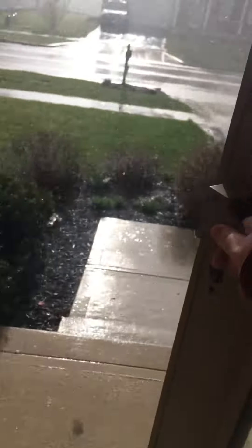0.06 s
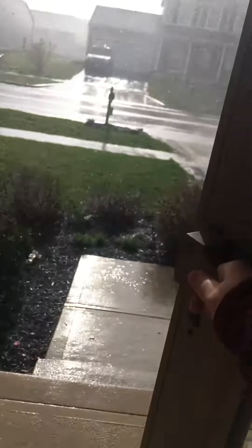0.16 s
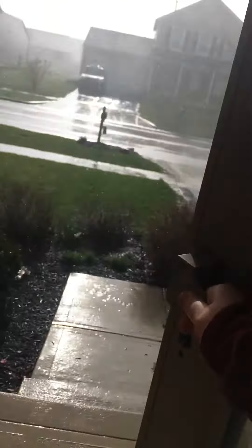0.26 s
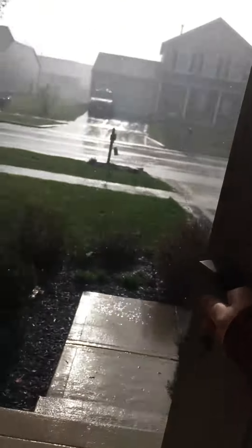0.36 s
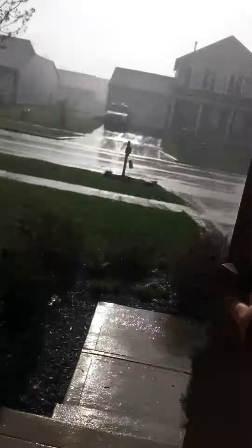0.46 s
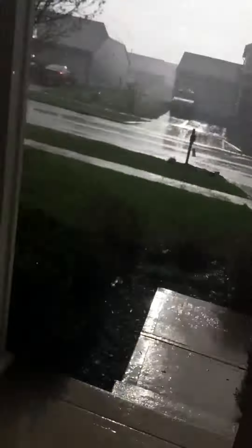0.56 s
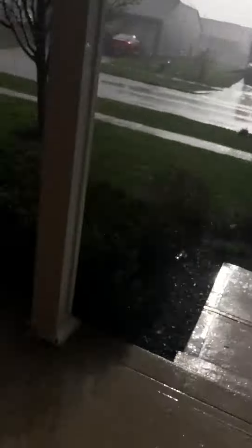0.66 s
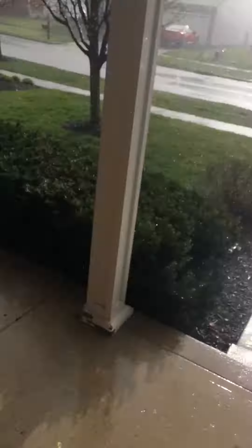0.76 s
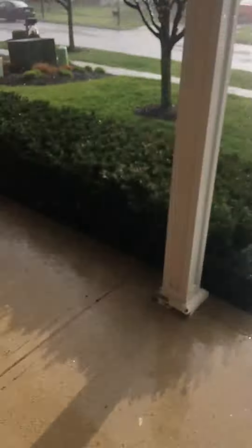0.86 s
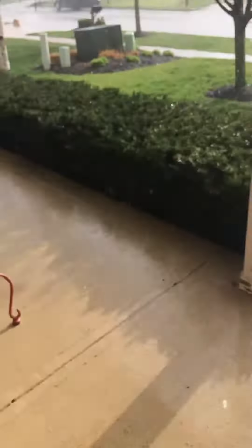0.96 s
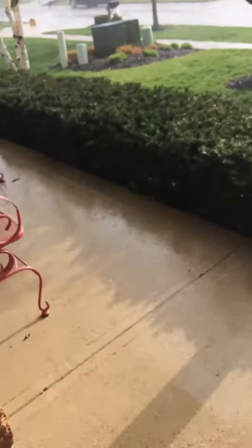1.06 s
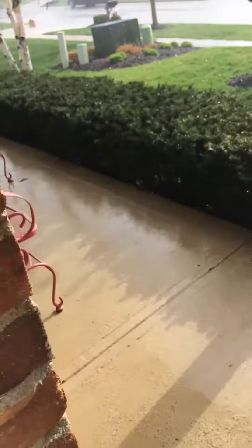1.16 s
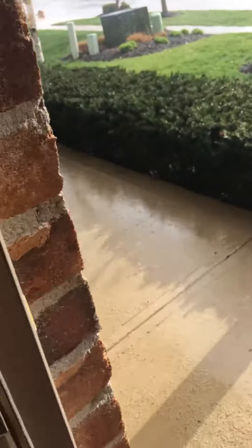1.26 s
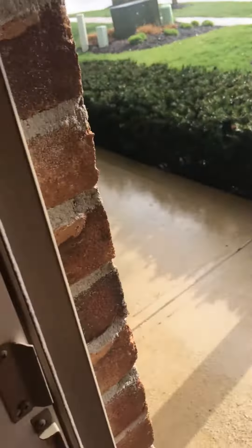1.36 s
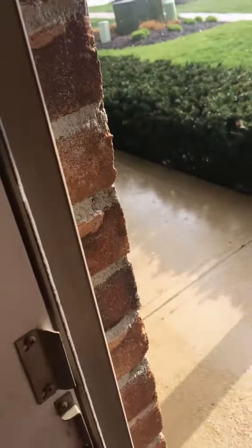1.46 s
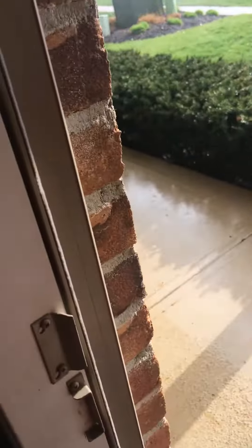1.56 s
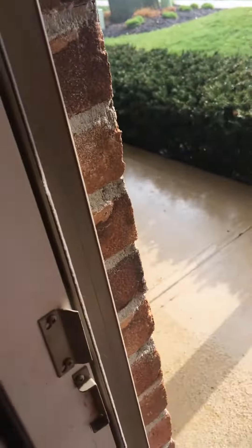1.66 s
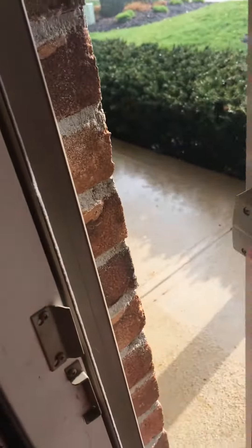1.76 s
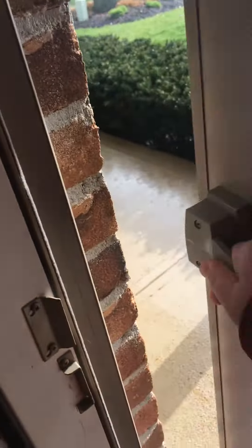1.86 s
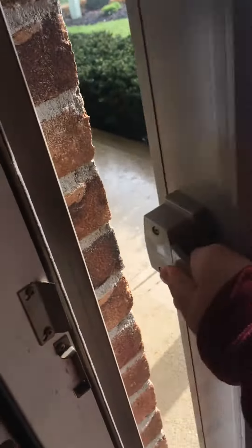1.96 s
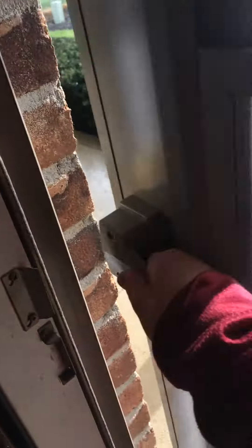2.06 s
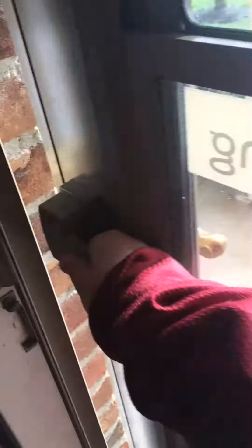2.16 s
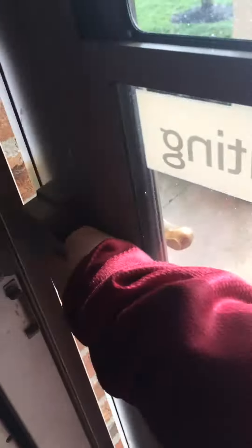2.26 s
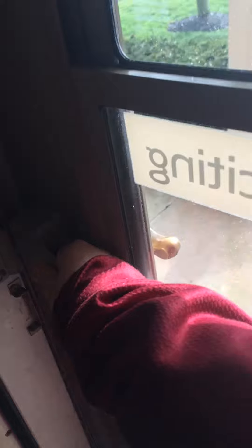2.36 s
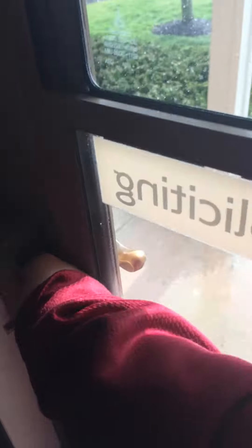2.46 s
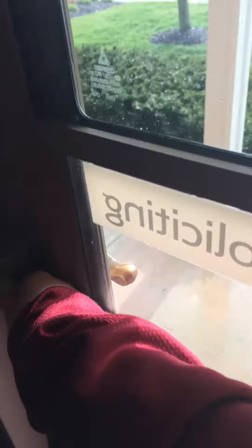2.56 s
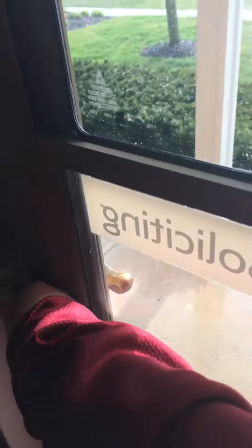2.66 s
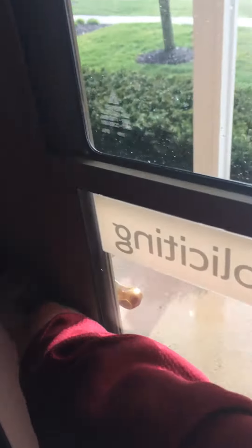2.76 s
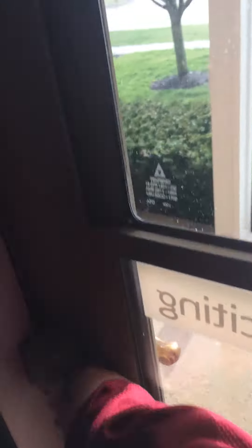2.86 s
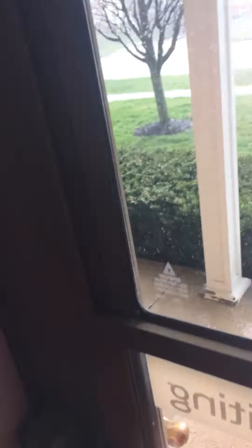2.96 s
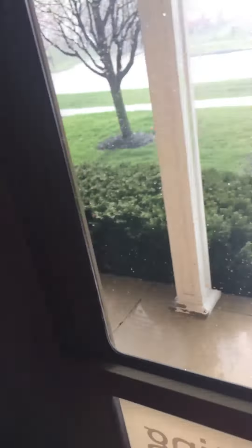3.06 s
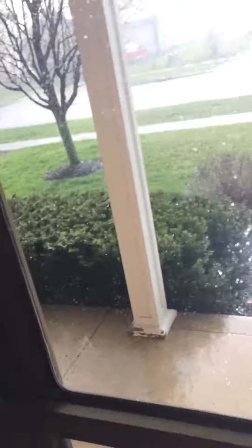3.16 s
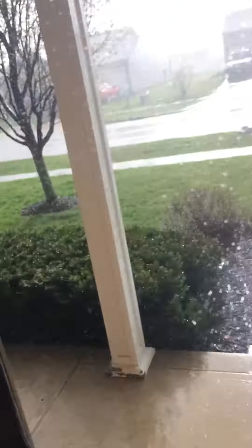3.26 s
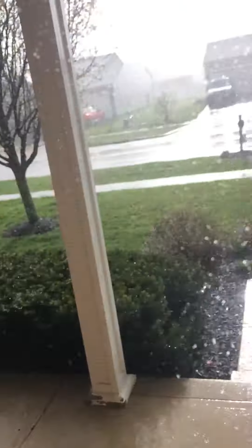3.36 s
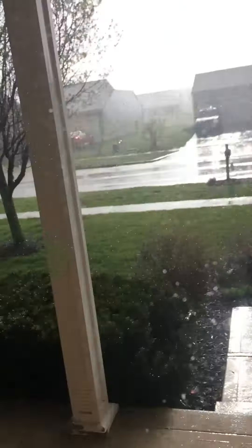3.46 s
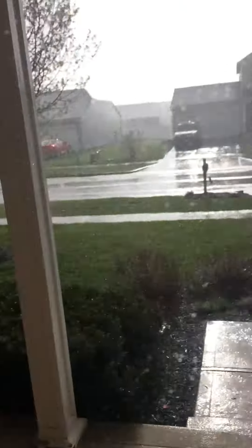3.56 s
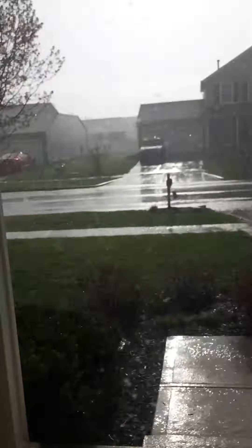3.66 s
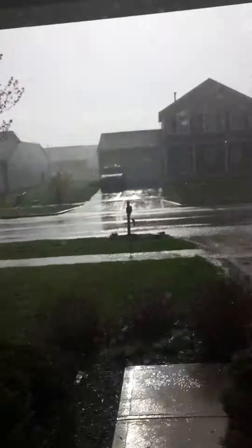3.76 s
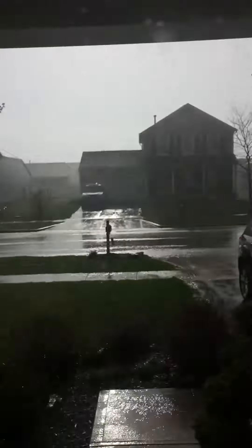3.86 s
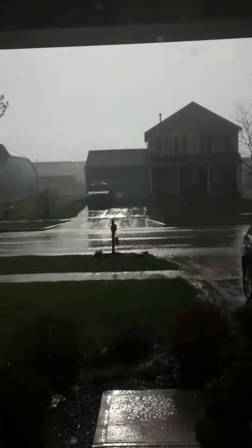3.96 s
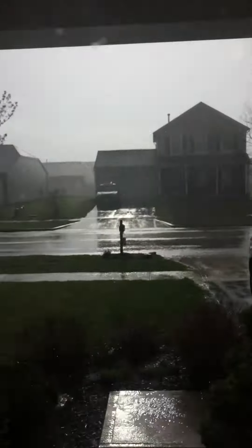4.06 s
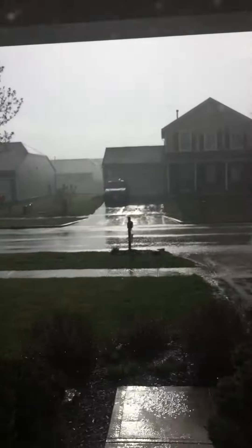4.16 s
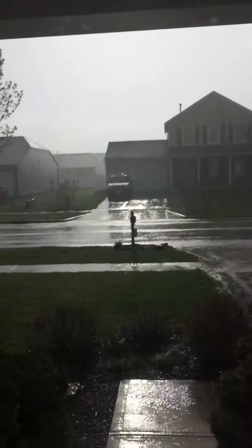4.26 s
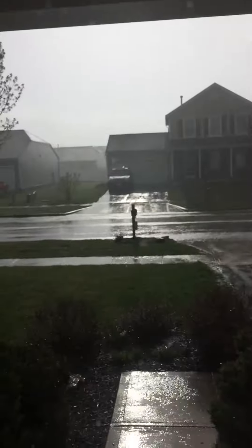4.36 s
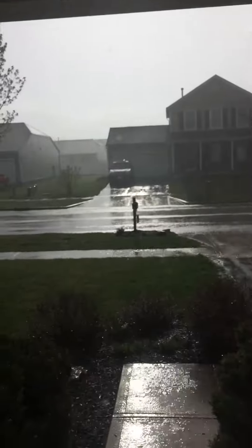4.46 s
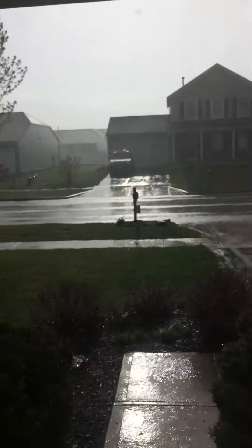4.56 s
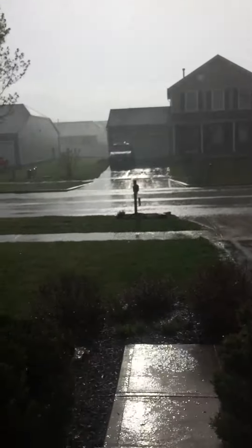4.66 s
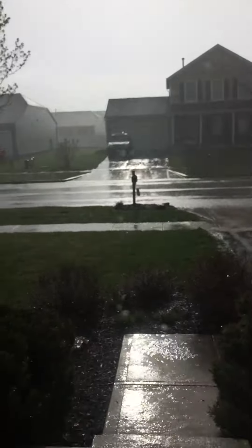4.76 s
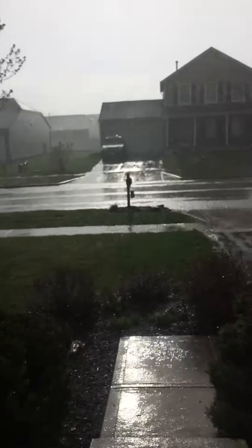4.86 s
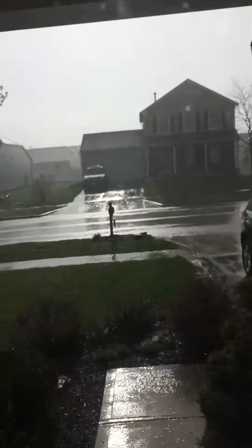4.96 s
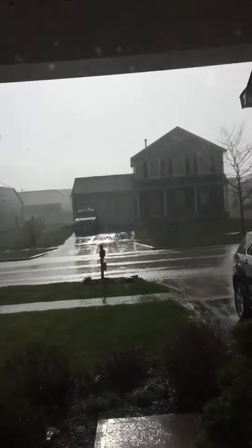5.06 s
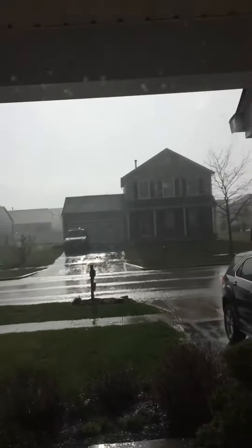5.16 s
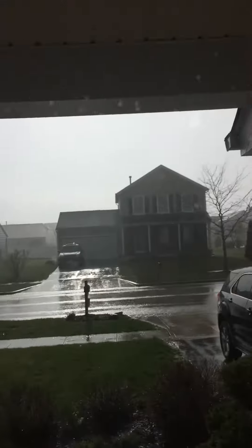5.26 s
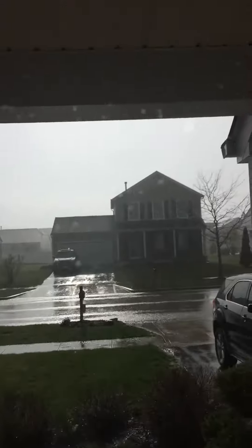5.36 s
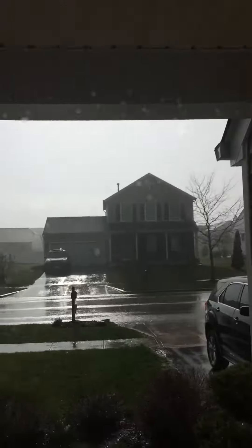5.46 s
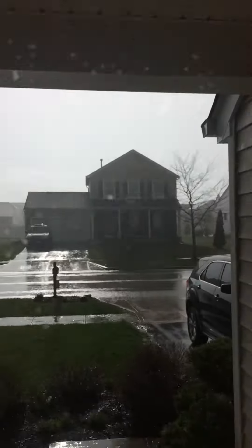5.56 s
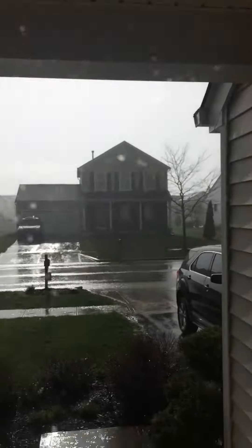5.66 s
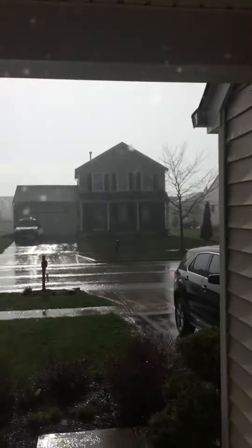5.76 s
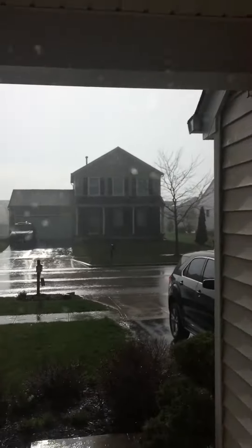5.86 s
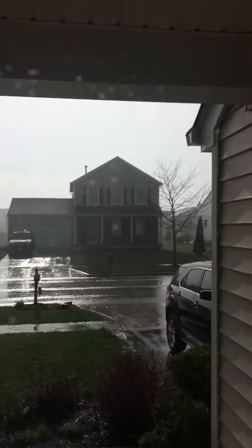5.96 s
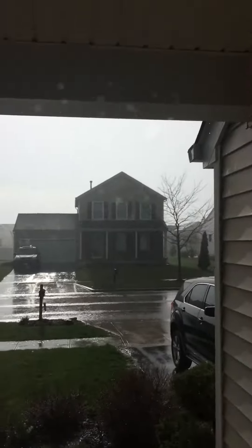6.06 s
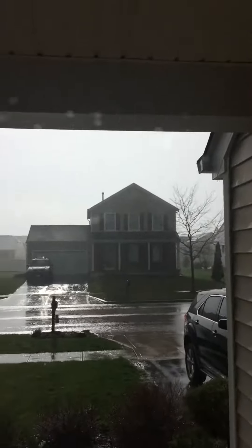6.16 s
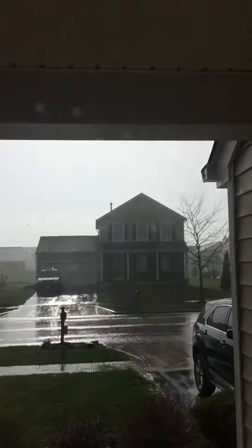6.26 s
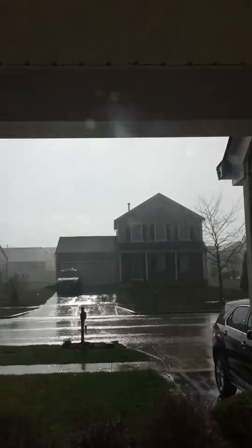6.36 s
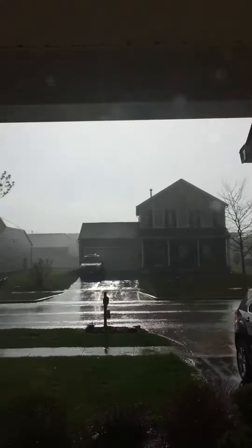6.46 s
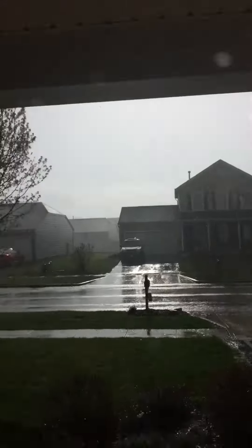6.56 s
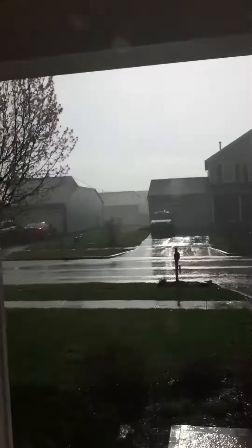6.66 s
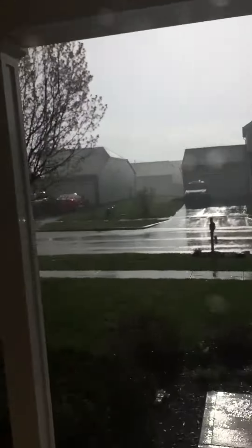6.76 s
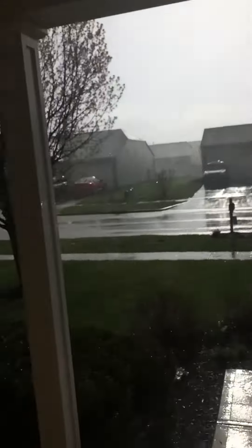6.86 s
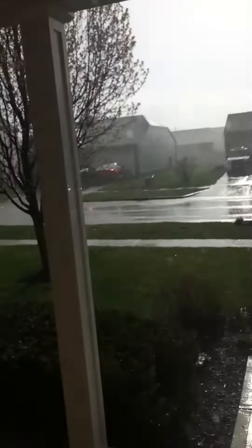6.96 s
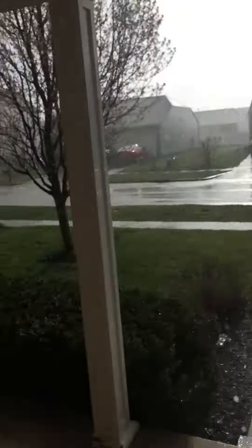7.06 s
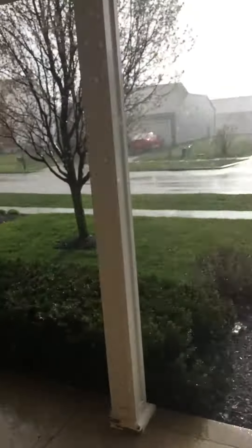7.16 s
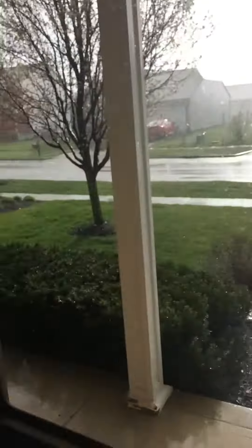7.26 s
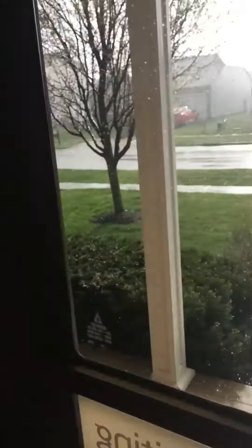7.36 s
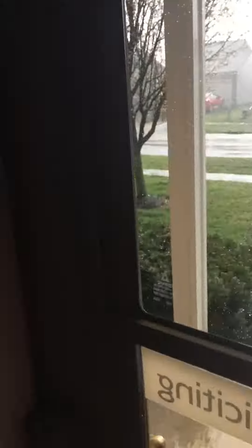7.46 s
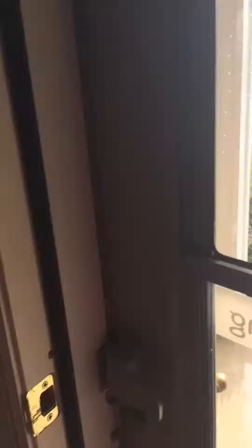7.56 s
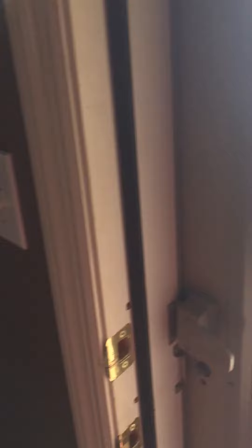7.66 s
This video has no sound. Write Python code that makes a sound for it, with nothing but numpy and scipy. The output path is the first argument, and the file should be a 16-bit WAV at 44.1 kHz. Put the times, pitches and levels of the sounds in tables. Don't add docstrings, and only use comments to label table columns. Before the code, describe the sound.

From a doorway, a handheld phone picks up dense rain hiss over low gusty rumble, muffled steps and fabric flicks. A door is pulled to, dulling the rain, until a hard metallic latch crack and heavy thump shut it out, with a brief rattle and short hallway reverberation. Then near quiet: muffled rain, light taps on the pane, dull footfalls, a firm late knock and faint cloth rubbing.

```python
import sys
import numpy as np
from scipy import signal
from scipy.fft import rfft, irfft, next_fast_len
from scipy.io import wavfile
from scipy.ndimage import uniform_filter1d, map_coordinates

SR = 44100
rng = np.random.default_rng(int(sys.argv[2]) if len(sys.argv) > 2 else 0)


def ratio_of_db(decibels):
    return 10 ** (np.asarray(decibels, float) / 20)


def store_wav(level_fs):
    pcm = np.round(np.clip(np.atleast_2d(level_fs), -1, 1) * 32767)
    wavfile.write(sys.argv[1], SR, pcm.T.astype(np.int16))


N = 340050

# time in seconds, gain in dB.
DOOR_GAP = [
    (0, -0.5),
    (0.75, 0.5),
    (1.43, -3.5),
    (2.09, -7.5),
    (2.36, -11.5),
    (2.52, -33),
    (2.6, -46),
]
# start in seconds, peak in dB, pitch in Hz.
STEPS = [(0.03, -34, 167), (0.044, -28.5, 64.6), (0.422, -25.5, 63), (0.488, -33, 102), (0.635, -29, 61.7),
         (0.669, -44.5, 90), (0.757, -28, 162), (0.793, -22, 146.6), (0.915, -30.5, 103),
         (2.073, -19.5, 136), (2.224, -36.5, 93), (3.506, -25.5, 140.4), (4.808, -28.5, 156),
         (4.849, -42, 103), (5.901, -48.5, 70.4)]
# start in seconds, peak in dB, pitch in Hz.
BLOWS = [
    (2.578, -28, 131),
    (2.649, -29.5, 78),
    (2.687, -31.5, 108),
    (2.855, -20.5, 147.6),
    (2.892, -15, 124.3),
    (2.938, -23.5, 108.8),
    (2.973, -24.5, 162.4),
    (3.002, -45, 126),
]
# start in seconds, peak in dB, pitch in Hz.
SEAT = [
    (2.9235, -10.5, 60.3),
]
# start in seconds, peak in dB, bolt ring in Hz, frame in Hz.
DRAG = [(2.5452, -20, 5200, 1658), (2.5524, -34.5, 2580, 720), (2.5775, -23.5, 3260, 1690),
        (2.5825, -36.5, 3000, 1490), (2.6234, -39.5, 3620, 719), (2.6364, -29, 3230, 1448),
        (2.6409, -21.5, 3403, 1420), (2.7132, -34, 4030, 1153), (2.7184, -34.5, 3990, 1630),
        (2.7496, -45, 4270, 830), (2.7664, -54.5, 5760, 877), (2.796, -44.5, 4575, 1379),
        (2.8234, -43, 3060, 705)]
# start in seconds, peak in dB, bolt ring in Hz, frame in Hz.
SNAP = [(2.8782, -2, 4490, 1860), (2.8838, -12, 4340, 1900), (2.9067, -27.5, 4450, 1040),
        (2.9232, -24, 2927, 1186), (2.9404, -20.5, 3050, 1720), (2.9591, -25.5, 3180, 840),
        (2.9746, -15, 2360, 1670), (2.9836, -22, 3970, 1200), (3.0008, -49, 3795, 1040),
        (3.0535, -37.5, 3240, 1610), (3.0746, -44, 3100, 1030), (3.1275, -37, 2700, 1180),
        (3.1774, -56, 2890, 714), (3.2368, -55, 2790, 2080)]
# frequency in Hz, density in dB per Hz.
RATTLE_COLOUR = [(180, -28), (300, 13), (729, -5), (1030, -6), (1120, -7), (2860, -12), (3660, -9),
                 (8460, -27.5), (15300, -26)]


def unit(x):
    return x / np.sqrt(np.mean(np.abs(x) ** 2) + 1e-20)


def along(points, hz):
    f, v = np.transpose(points)
    return np.interp(np.log(hz + 1), np.log(f + 1), v)


def curves(rows, outside=None):
    s, *cols = np.transpose(rows)
    return [np.interp(np.arange(N) / SR, s, c, outside, outside) for c in cols]


def wobble(rate):
    knots = rng.standard_normal(int(N * rate / SR) + 4)
    return map_coordinates(knots, [np.arange(N) * rate / SR])


def filtered(x, response):
    m = next_fast_len(len(x) + 8192)
    return irfft(rfft(x, m) * response(np.fft.rfftfreq(m, 1 / SR)), m)[:len(x)]


def resonance(f, hz, width):
    return 1j * f * width / (hz * hz - f * f + 1j * f * width)


def patches(shape, bands):
    field = uniform_filter1d(rng.standard_normal(shape), size=bands, axis=0)
    return unit(uniform_filter1d(field, size=8, axis=1))


def rush(colour, patchy_db, drops=0):
    z = signal.stft(rng.standard_normal(N), nperseg=512)[2]
    noise = signal.istft(z * ratio_of_db(patchy_db * patches(z.shape, 14)), nperseg=512)[1][:N]
    hits = rng.random(N) < 900 / SR
    sizes_db = 4 * np.minimum(rng.exponential(size=N), 3.5)
    impacts = hits * rng.uniform(-1, 1, N) * ratio_of_db(sizes_db)
    return unit(filtered(unit(noise) + drops * unit(impacts), lambda hz: ratio_of_db(along(colour, hz))))


def add(track, s, sound):
    part = track[round(s * SR):][:len(sound)]
    part += sound[:len(part)]


def aftermath(rows, db, grows, rise, t60):
    power, t = np.zeros(N), np.arange(SR // 2) / SR
    for s, peak_db, *_ in rows:
        swell = ratio_of_db(db + grows * peak_db - 60 * t / t60) * (1 - np.exp(-t / rise))
        add(power, s, swell ** 2)
    return np.sqrt(power)


def tones(rows, soft, shake_db):
    t, out = np.arange(N) / SR, np.zeros(N)
    for start, stop, hz, db, t60 in rows:
        gate = np.clip((t - start) / soft, 0, 1) * np.clip((stop - t) / 0.02, 0, 1)
        level = ratio_of_db(db - 60 * np.abs(t - start) / t60 + shake_db * wobble(25))
        out += level * gate * np.sin(2 * np.pi * hz * t)
    return out


def rain():
    # frequency in Hz, density in dB per Hz.
    patter_colour = [(120, -29), (200, 1), (248, 0.5), (325, -9), (557, -7.5), (769, -15), (1120, -8),
                     (5000, -23.5), (6500, -51.5), (11000, -120)]
    hiss_colour = [(1470, 1.5), (2500, 0.5), (3850, -4), (6800, -3), (7730, -5.5), (13000, -6.5),
                   (15300, -12)]
    indoor_colour = [(120, -39), (200, -2), (244, -9.5), (421, -7.5), (553, -10.5), (687, -10), (794, -14),
                     (1250, -12.5), (1550, -15), (2730, -17), (4970, -24), (6890, -22), (12100, -29),
                     (15300, -29)]
    # time in seconds, level in dB.
    murmur = [
        (0, -58),
        (5.3, -60.5),
        (7.3, -59),
        (7.71, -64.5),
    ]
    gap_db, surge_db = curves(DOOR_GAP)[0], 0.14 * wobble(12)
    patter = ratio_of_db(-47 + gap_db + surge_db) * rush(patter_colour, patchy_db=1.5, drops=0.22)
    hiss = ratio_of_db(-46 + 2 * gap_db + surge_db) * rush(hiss_colour, patchy_db=2.5, drops=0.32)
    murmur_db = curves(murmur)[0] + 0.19 * wobble(5.5)
    return patter + hiss + ratio_of_db(murmur_db) * rush(indoor_colour, patchy_db=1.5, drops=0.18)


def rumble():
    # frequency in Hz, density in dB per Hz.
    deep_colour = [(12, -40), (20, -20), (53, 0), (108, -3), (146, -0.5), (204, -12.5), (350, -18.5),
                   (460, -29.5), (770, -120)]
    calm_colour = [(12, -67), (20, -23), (52, -5.5), (108, -1), (173, -6.5), (239, -14), (350, -17.5),
                   (460, -51.5), (770, -120)]
    gusty = unit(ratio_of_db(2.8 * wobble(13)) * rush(deep_colour, patchy_db=1))
    storm = ratio_of_db(-45.5 + curves(DOOR_GAP)[0])
    pushes = aftermath(STEPS + BLOWS + SEAT, db=-14.5, grows=0.94, rise=0.017, t60=0.4)
    return np.hypot(storm, pushes) * gusty + ratio_of_db(-55.5) * rush(calm_colour, patchy_db=0.4)


def chime():
    # strike in seconds, damped in seconds, pitch in Hz, level in dB, t60 in seconds.
    rods = [
        (.205, .42, 8899, -38, 0.75),
        (.205, 0.44, 8624, -47, 2.5),
        (.205, 0.28, 13920, -48, .16),
        (.205, .3, 14350, -52, .26),
        (-0.033, .09, 4581, -49, 2),
        (.11, .33, 4581, -52.5, 1.5),
        (-0.056, 0.11, 4382, -51, 0.72),
    ]
    tick = np.zeros(N)
    tick[round(rods[0][0] * SR)] = ratio_of_db(-10)
    tick = filtered(tick, lambda f: resonance(f, 9200, 1200) + 0.5 * resonance(f, 13000, 2000))
    return tones(rods, soft=0.0005, shake_db=3) + tick


def thuds(rows, contact_s, ring_db):
    out, t = np.zeros(N), np.arange(SR // 2) / SR
    through = np.clip(t / contact_s, 0, 1)
    press = np.sin(np.pi * through)
    after = ratio_of_db(ring_db - 60 * t / 0.2) * through
    sag = 0.0084 * (1 - np.exp(-t / 0.015))
    for s, db, hz in rows:
        mode = np.sin(2 * np.pi * hz * (0.813 * t + sag))
        add(out, s - 0.001, ratio_of_db(db) * np.maximum(press, after) * mode)
    return out


def body_thuds():
    # start in seconds, peak in dB, pitch in Hz.
    pane_thump = [
        (6.137, -15.5, 142.3),
    ]
    feet = thuds(STEPS + pane_thump, contact_s=0.037, ring_db=-7)
    leaf = thuds(BLOWS, contact_s=0.043, ring_db=-15)
    return feet + leaf + thuds(SEAT, contact_s=0.015, ring_db=-14)


def knocks():
    # start in seconds, peak in dB, contact pitch in Hz, low part in dB.
    taps = [(0.427, -34, 596, 5), (0.71, -31, 647, -6), (0.799, -26, 742, 3), (0.807, -29.5, 810, -7),
            (1.297, -35, 1610, -1), (2.908, -16.5, 1014, -2.5), (2.914, -18, 1005, -10),
            (3.942, -27, 1022, -12.5), (4.667, -45.5, 1230, -6.5), (5.621, -29.5, 1060, -13.5),
            (5.625, -28, 1004, -6.5), (5.67, -53, 1220, -0.5), (5.922, -46.5, 1400, -2),
            (6.127, -28, 1110, 6), (6.137, -13.5, 1147, -4), (6.143, -21, 994, -5), (6.184, -35, 1100, 6.5)]
    # frequency in Hz, level in dB, t60 in seconds.
    pane_modes = [(209.3, 8.5, 0.27), (390, -23, 0.2), (418, -9, 0.28), (705, -7, 0.29), (777, -5.5, 0.06),
                  (844, -9.5, 0.23), (908, -1.5, 0.11), (1060, -14, 0.22), (1470, -16.5, 0.057),
                  (1530, -44.5, 0.22), (1820, -15, 0.1), (2230, -19.5, 0.063)]
    contact_t60 = 0.04
    out, t = np.zeros(N), np.arange(SR // 2) / SR
    for s, db, hz, low_db in taps:
        noise = rng.standard_normal((4, len(t)))
        luck_db = rng.normal(0, 2, len(pane_modes))
        contact = np.sin(2 * np.pi * hz * t) * ratio_of_db(-60 * t / contact_t60)
        grit = filtered(noise[0] * ratio_of_db(-60 * t / (0.72 * contact_t60)),
                        lambda f: resonance(f, hz, 1.22 * hz) ** 2)
        low = filtered(noise[1] * ratio_of_db(-60 * t / 0.051), lambda f: resonance(f, 374, 240) ** 2)
        click = filtered(noise[2] * ratio_of_db(-60 * t / 0.035), lambda f: resonance(f, 2800, 4000) ** 3)
        click_db = -34.5 - 0.8 * (db + 4.5) - 0.8 * low_db
        lasting = np.clip(1 + db / 35, 0.3, 1)
        ring = np.zeros(len(t))
        for (mode, level, t60), more in zip(pane_modes, luck_db):
            mode_db = level + more + low_db * (mode < 300)
            ring += ratio_of_db(mode_db - 60 * t / (t60 * lasting)) * np.sin(2 * np.pi * mode * t)
        blur = filtered(noise[3] * ratio_of_db(-60 * t / (0.6 * lasting)), lambda f: resonance(f, 800, 870) ** 3)
        mix = contact + 1.23 * grit + ratio_of_db(low_db + 19.5) * low + ratio_of_db(click_db) * click
        mix += ratio_of_db(-7) * ring + 0.68 * blur
        add(out, s + 0.0012, ratio_of_db(db - 3) * mix * (1 - np.exp(-t / 0.00035)))
    return out


def cloth_flicks():
    # start in seconds, peak in dB, centre in Hz.
    flicks = [(0.584, -44.5, 3870), (0.666, -27.5, 6840), (0.847, -33.5, 5330), (0.938, -35, 6540),
              (1.232, -34.5, 8900), (1.5194, -56.5, 3680), (3.384, -50, 6000), (3.5, -48, 9000),
              (3.615, -51.5, 7000), (3.6438, -49, 6670), (3.682, -42, 3160), (3.725, -46.5, 2570),
              (3.833, -48.5, 6500), (4.01, -50, 2800), (4.0921, -48.5, 9040), (4.382, -49, 3040),
              (4.82, -45, 2920), (4.912, -50, 5800), (5.203, -58, 2850), (5.233, -47.5, 6900),
              (5.338, -50.5, 8190), (5.87, -66, 2710), (6.562, -51.5, 9500), (6.58, -46, 2970),
              (7.11, -51, 4920), (7.311, -39.5, 2900)]
    out, t = np.zeros(N), np.arange(SR // 4) / SR
    for s, db, hz in flicks:
        octaves = np.clip(1.37 + 0.025 * (db + 37), 0.4, 1.1)
        spread = lambda f: np.where(f < hz, 0.56 * octaves, octaves)
        band = filtered(rng.standard_normal(len(t)),
                        lambda f: np.exp(-0.5 * (np.log2((f + 1) / hz) / spread(f)) ** 2))
        envelope = (1 - np.exp(-t / 0.0028)) * np.exp(-(t / 0.028) ** 2)
        add(out, s, ratio_of_db(db - 11) * unit(band) * envelope)
    return out


def sleeve_slide():
    # time in seconds, level in dB, lower band in Hz.
    sleeve = [
        (6.6, -72, 6000),
        (6.8, -59.5, 5950),
        (6.95, -56.5, 4530),
        (7.15, -57.5, 1970),
        (7.28, -63, 1600),
        (7.42, -78.5, 1500),
    ]
    f, times, z = signal.stft(rng.standard_normal(N), SR, nperseg=512)
    s, _, hz = np.transpose(sleeve)
    hz = np.interp(times, s, hz)
    bump = lambda centre, octaves: np.exp(-0.5 * (np.log2((f[:, None] + 1) / centre) / octaves) ** 2)
    parting = np.clip((5060 - hz) / (5060 - 3100), 0.12, 1.4)
    wash = bump(6400, 0.38) + 0.13 * bump(11500, 0.29) + 0.5 * bump(740, 1)
    shape = parting * bump(hz, 0.47) + wash
    slide = signal.istft(z * shape * ratio_of_db(2.2 * patches(z.shape, 7)), SR, nperseg=512)[1][:N]
    return ratio_of_db(curves(sleeve, -120)[0]) * unit(slide)


def latch(rows, frame_db, sizzle_db):
    # frequency in Hz, level in dB, t60 in seconds.
    plate_modes = [(4370, -5.5, .03), (4756, -4, 0.031), (5020, -7.5, 0.023), (6500, -1, 0.019),
                   (7800, -5.5, 0.017)]
    out, t = np.zeros(N), np.arange(SR // 6) / SR
    plate = sum(ratio_of_db(level - 60 * t / t60) * np.sin(2 * np.pi * mode * t) for mode, level, t60 in plate_modes)
    for s, db, hz, frame_hz in rows:
        noise = rng.standard_normal((2, len(t)))
        bolt = np.sin(2 * np.pi * hz * t) * ratio_of_db(-60 * t / 0.016)
        decay = ratio_of_db(-60 * t / 0.023) + 0.091 * ratio_of_db(-60 * t / 0.19)
        burst = noise[0] * (1 - np.exp(-t / 0.0005)) * decay
        crack = filtered(burst, lambda f: resonance(f, 0.6 * hz + 2300, 3100) ** 3
                         + ratio_of_db(sizzle_db + 12.5) * resonance(f, 8205, 4000) ** 2)
        shove = filtered(noise[1] * ratio_of_db(-60 * t / 0.061),
                         lambda f: (resonance(f, frame_hz, 493) + 0.19) * resonance(f, 800, 1607)
                         + 0.26 * resonance(f, 600, 400))
        hit = ratio_of_db(db - 4.5) * (0.6 * bolt + 1.15 * crack)
        hit += ratio_of_db(1.4 * db - 14) * plate
        hit += ratio_of_db(0.78 * db + frame_db + 3.5) * shove
        add(out, s + 0.00071, hit)
    return out


def shudder():
    # frequency in Hz, density in dB per Hz.
    leaf_colour = [(12, -36), (20, -11.5), (48, -3.5), (81, -7.5), (118, -7), (217, -8), (248, -15.5),
                   (500, -32), (650, -48), (1100, -120)]
    buzz = unit(ratio_of_db(4.2 * wobble(150)) * rush(RATTLE_COLOUR, patchy_db=3))
    dull = filtered(buzz, lambda f: 1 / (1 + 1j * f / 4500) ** 2)
    boom_gain = aftermath(BLOWS, db=-12, grows=0.73, rise=0.0054, t60=0.45)
    boom = boom_gain * rush(leaf_colour, patchy_db=0.5)
    drag_buzz = dull * aftermath(DRAG, db=-18, grows=0.57, rise=0.0062, t60=0.15)
    snap_buzz = buzz * aftermath(SNAP, db=-23.5, grows=0.57, rise=0.0062, t60=0.18)
    return boom + drag_buzz + snap_buzz


def bolt_edge():
    # start in seconds, peak in dB.
    ticks = [
        (2.5775, -44),
        (2.7132, -39),
        (2.796, -45.5),
        (2.879, -18),
        (2.9073, -22.5),
        (2.9403, -32.5),
        (2.9591, -35),
        (2.9742, -23),
        (3.127, -44.5),
    ]
    out, t = np.zeros(N), np.arange(SR // 20) / SR
    for s, db in ticks:
        add(out, s + 0.0008, ratio_of_db(db - 60 * t / 0.014) * rng.standard_normal(len(t)))
    rub_from = 2.845
    way = (np.arange(N) / SR - rub_from) / (SNAP[0][0] - rub_from)
    rub_db = -38.5 - 19 * (0.5 - np.clip(way, 0, 1))
    rub = ((way > 0) & (way < 1)) * ratio_of_db(rub_db) * rush(RATTLE_COLOUR, patchy_db=3)
    return rub + filtered(out, lambda f: resonance(f, 11000, 11000) ** 2 + 0.6 * resonance(f, 7600, 1500))


def hums():
    # start in seconds, stop in seconds, pitch in Hz, level in dB, t60 in seconds.
    low_modes = [
        (2.99, 3.26, 346, -48, 1.3),
        (4.33, 4.55, 169, -54, 3),
    ]
    return tones(low_modes, soft=0.021, shake_db=-1)


def hall(x):
    # frequency in Hz, t60 in seconds.
    hall_decay = [(150, 0.39), (1000, 0.4), (4000, 0.23), (12000, 0.28)]
    hz, t, z = signal.stft(rng.standard_normal(SR // 2), SR, nperseg=256)
    tail = signal.istft(z * ratio_of_db(-60 * t / along(hall_decay, hz)[:, None]), SR, nperseg=256)[1]
    return signal.fftconvolve(np.pad(x, (200, 0)), tail / np.linalg.norm(tail))[:N]


def scene():
    feet, pane = body_thuds(), knocks()
    metal = latch(DRAG, frame_db=-1, sizzle_db=-40.5) + latch(SNAP, frame_db=-4.5, sizzle_db=-18) + bolt_edge()
    room = hall(ratio_of_db(-15.5) * metal + ratio_of_db(-23) * pane + ratio_of_db(-11.5) * feet)
    door = metal + pane + shudder() + hums()
    weather = rain() + rumble() + chime()
    return (weather + feet + door + cloth_flicks() + sleeve_slide() + room)[None]


def top_cut(x):
    return signal.sosfilt(signal.butter(12, 16510, fs=SR, output="sos"), x)


def record(dry):
    limited = filtered(dry[0], lambda hz: np.where(hz < 15300, 1, ratio_of_db(-32)) * 1j * hz / (30 + 1j * hz))
    return top_cut(limited[None])


dry = scene()
out = record(dry)
store_wav(out)
```